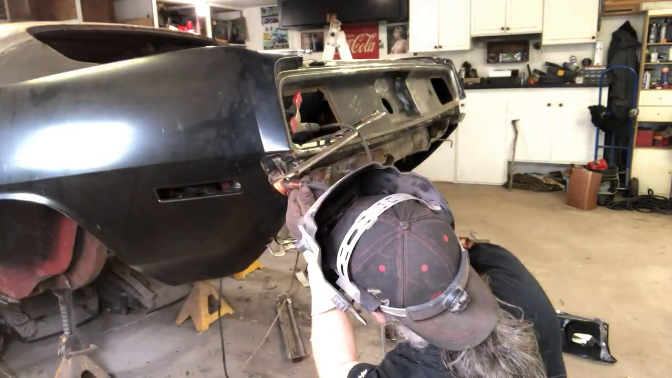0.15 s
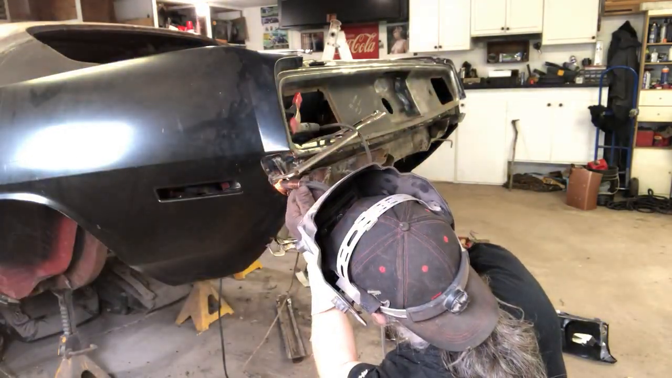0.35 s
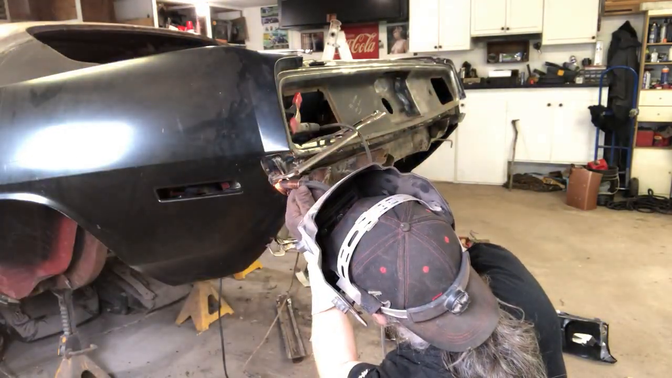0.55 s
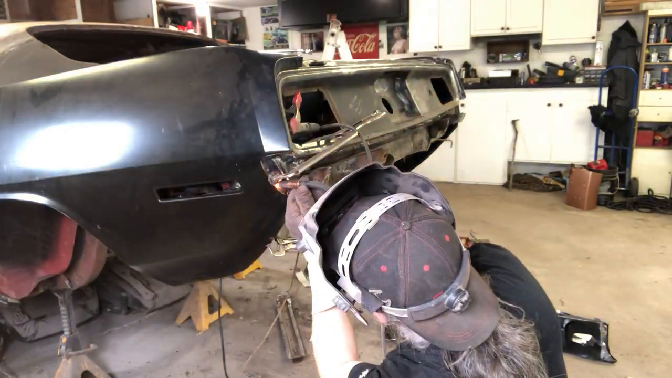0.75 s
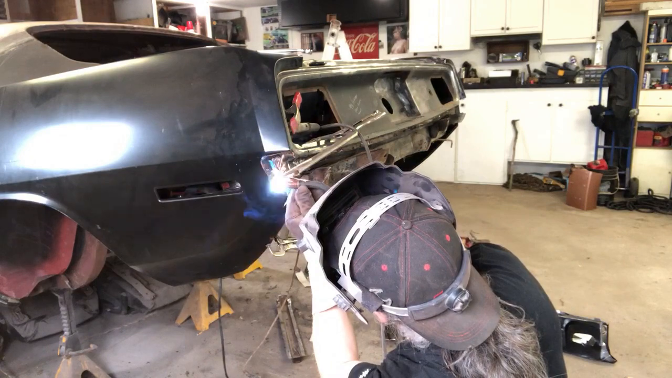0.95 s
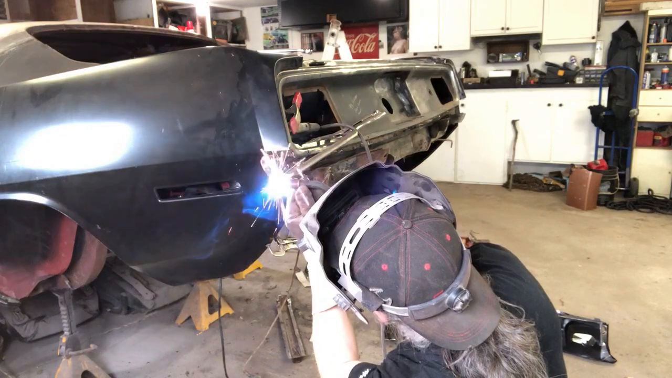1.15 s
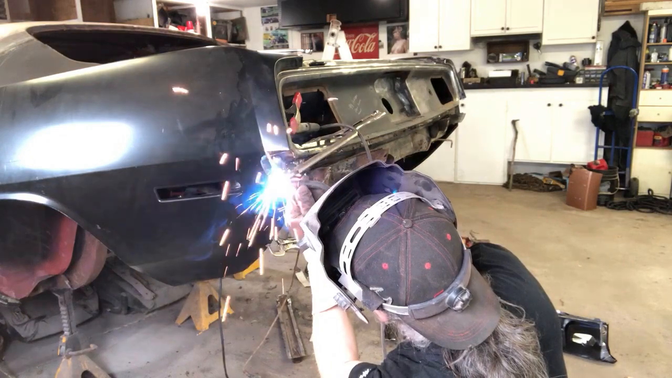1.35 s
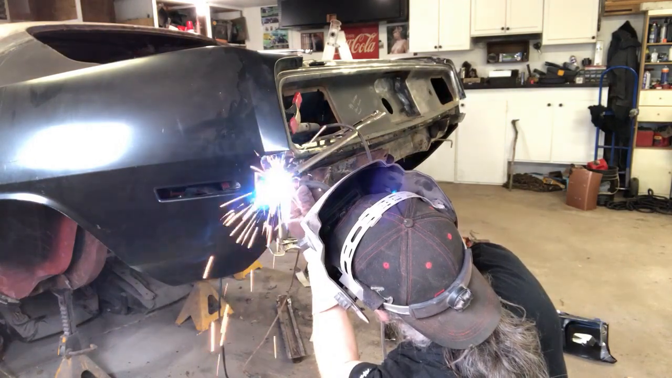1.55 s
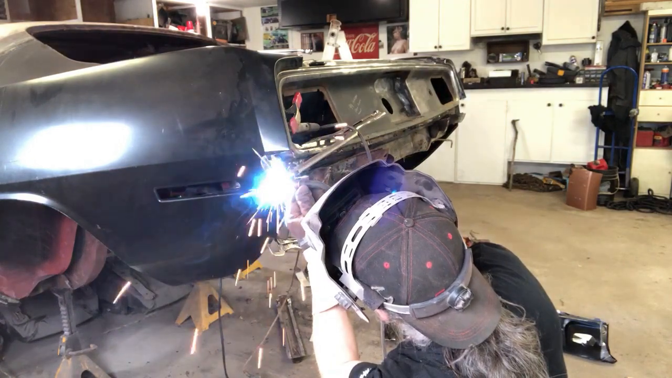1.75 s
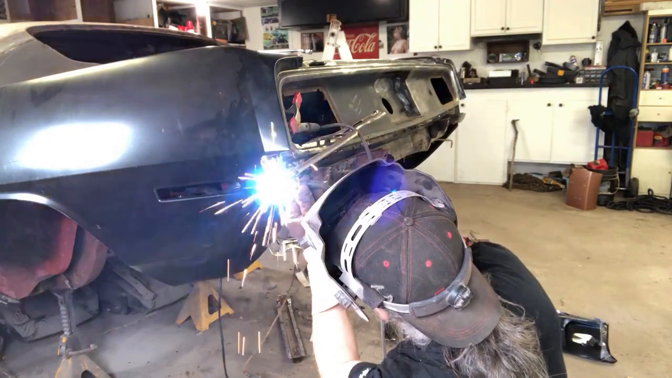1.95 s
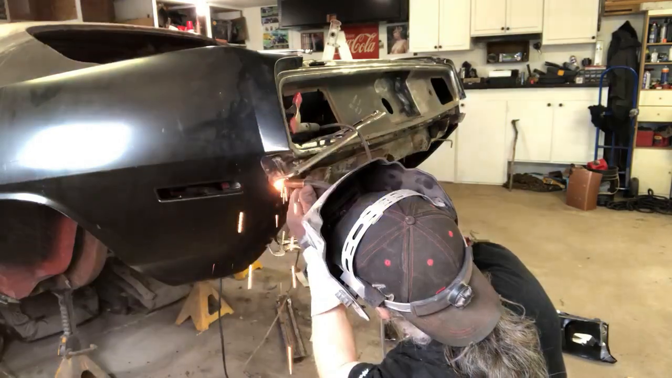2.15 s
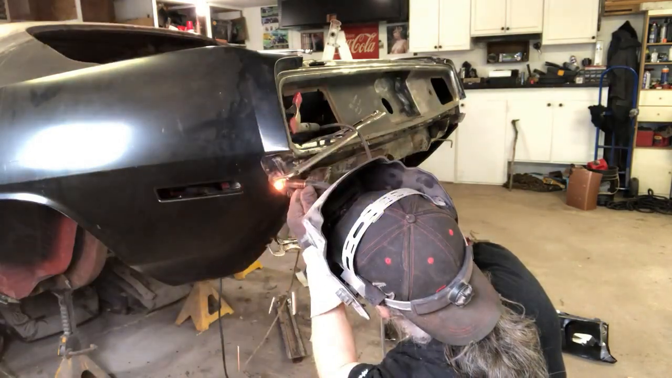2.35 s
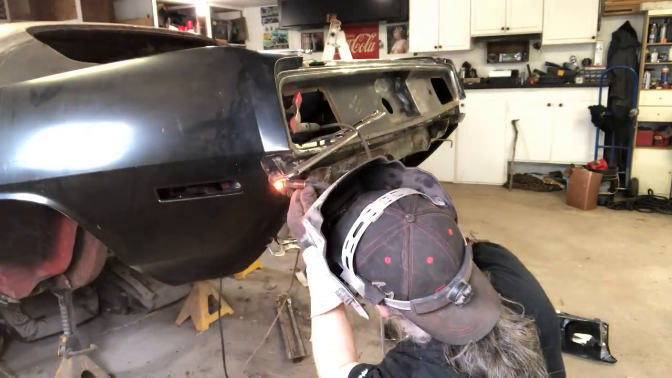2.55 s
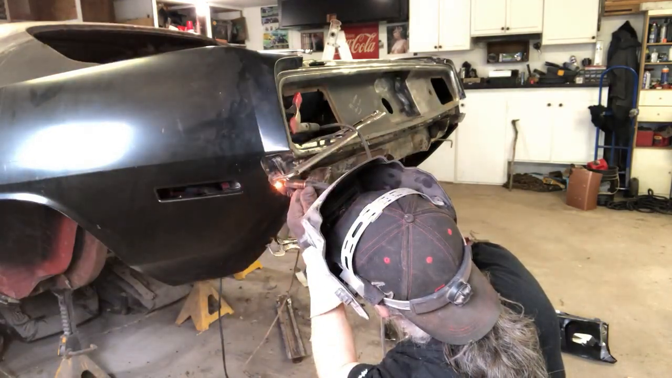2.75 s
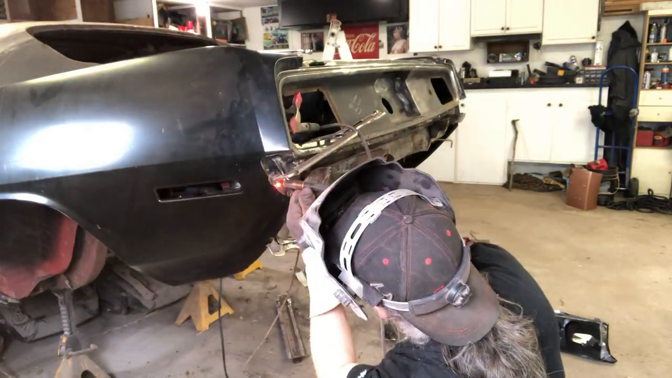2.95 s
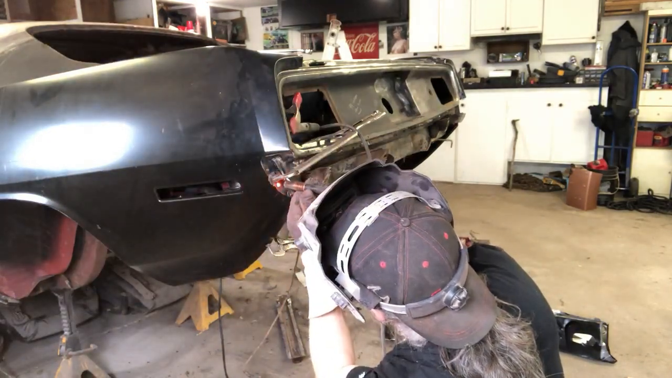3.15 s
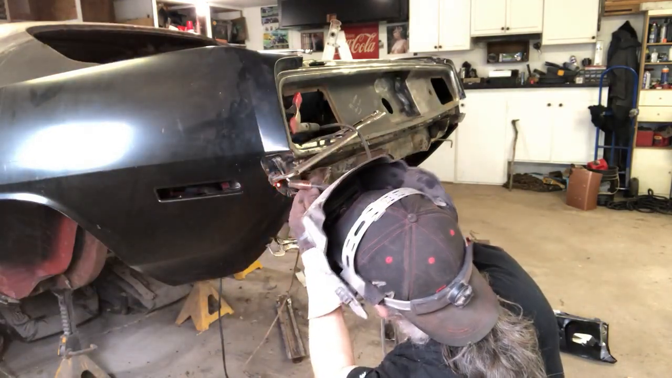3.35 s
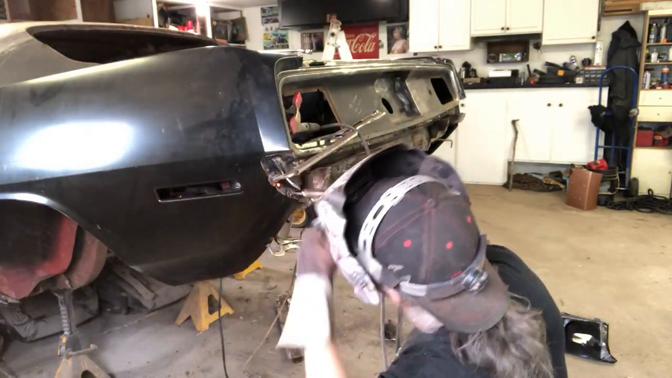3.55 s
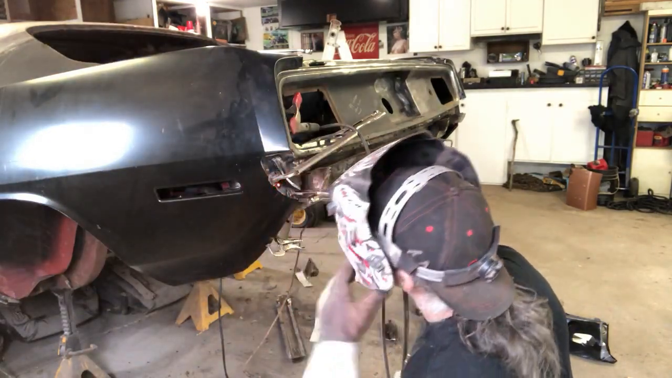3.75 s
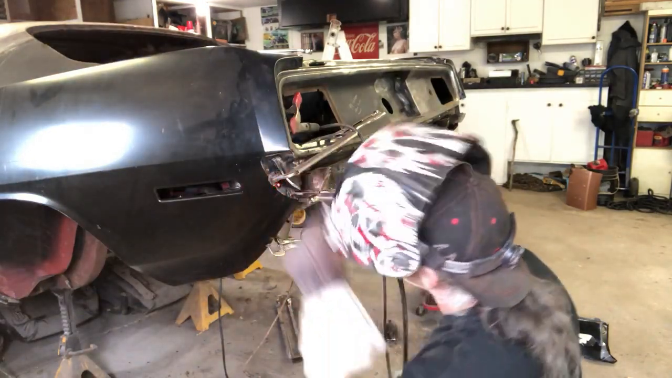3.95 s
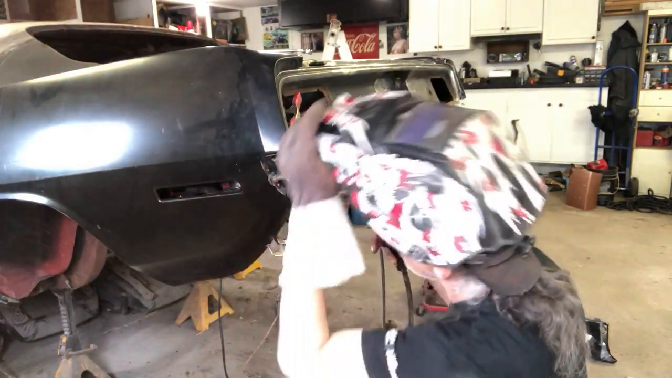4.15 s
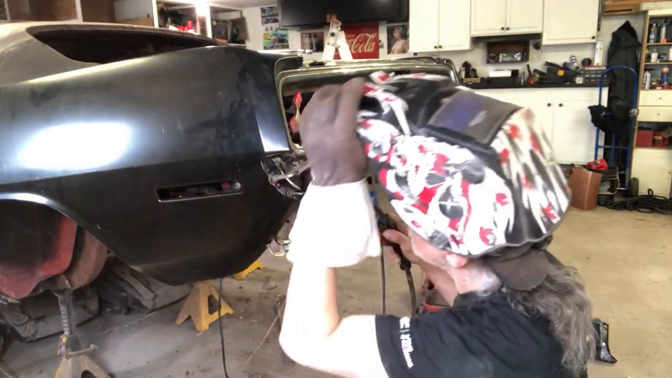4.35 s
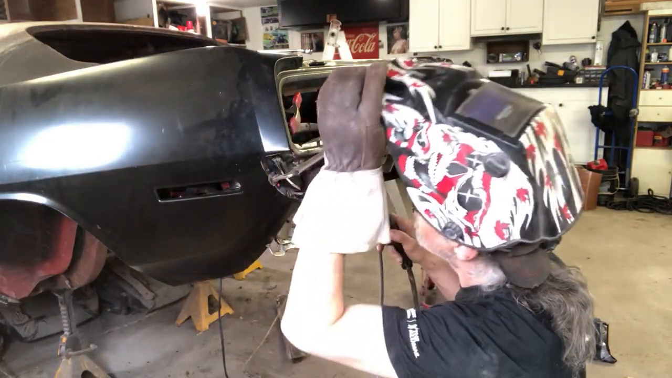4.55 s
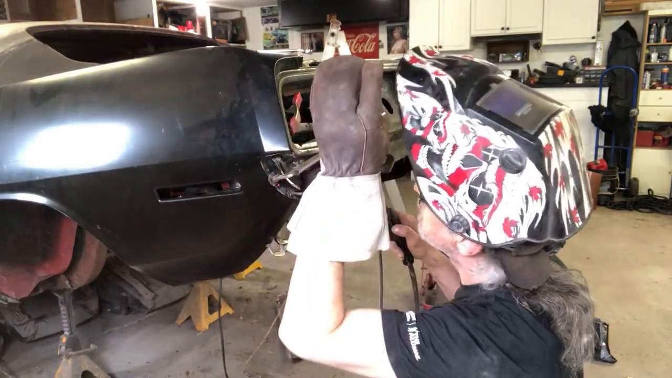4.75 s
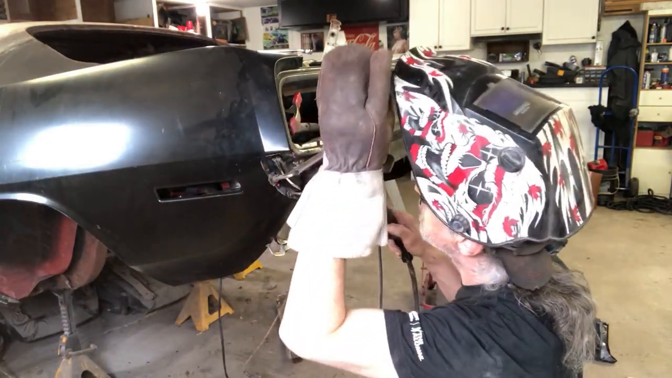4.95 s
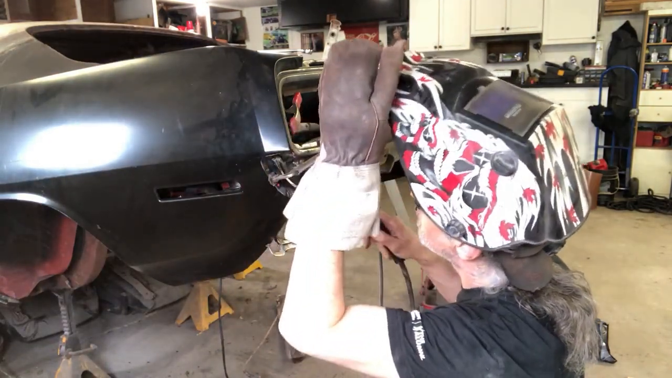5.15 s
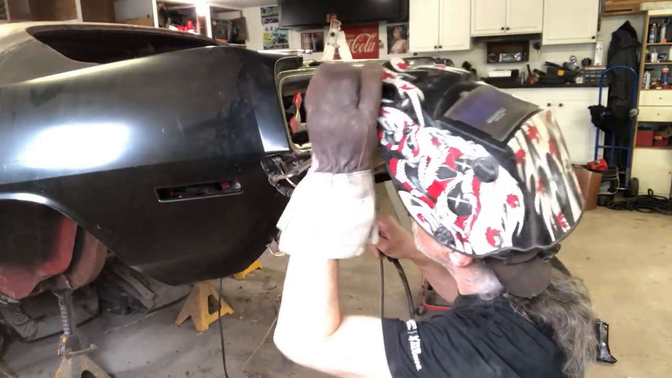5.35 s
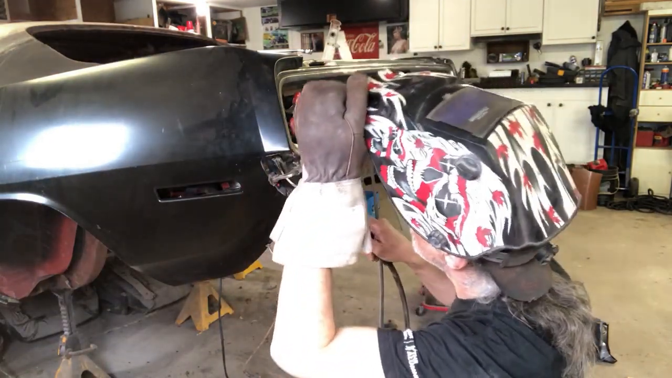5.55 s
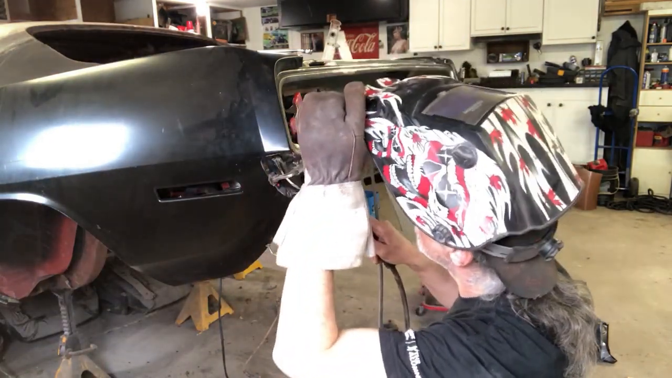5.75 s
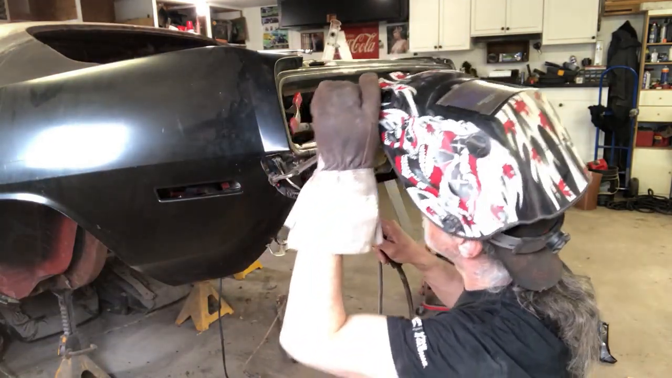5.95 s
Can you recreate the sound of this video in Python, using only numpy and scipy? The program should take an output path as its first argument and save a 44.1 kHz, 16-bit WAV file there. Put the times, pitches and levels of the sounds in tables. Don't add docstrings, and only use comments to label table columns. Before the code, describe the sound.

A welding machine's fan hums steadily in a closed garage while one short, sharply crackling weld burst snaps on sheet metal, then a helmet knocks softly.

```python
import sys
import numpy as np
from scipy import signal
from scipy.fft import rfft, irfft, next_fast_len
from scipy.io import wavfile
from scipy.ndimage import uniform_filter1d

SR = 44100
rng = np.random.default_rng(int(sys.argv[2]) if len(sys.argv) > 2 else 0)


def voltage_ratio(level):
    return 10 ** (np.asarray(level, float) / 20)


def to_wav(s):
    ch = np.atleast_2d(s).T
    pcm = np.round(np.clip(ch, -1, 1) * 32767)
    wavfile.write(sys.argv[1], SR, pcm.astype(np.int16))


N = 264585
SIZE = next_fast_len(N + SR)
HZ = np.fft.rfftfreq(SIZE, 1 / SR)
TIME = np.arange(N) / SR

# [multiple of shaft rate, level/dB, waver/dB]
FAN_TONES = [(4, -58.0, 3.0), (6, -64.0, 3.0), (11, -64.0, 2.2), (16, -70.0, 2.2), (20, -67.0, 2.2),
             (25, -65.0, 2.2), (35, -80.0, 2.2), (40, -83.0, 2.2)]
# [f/Hz, density/dB]
FAN_AIR = [(15, -65), (25, -20.5), (108, -15.5), (245, -4), (304, -20), (433, -16.5), (496, -17),
           (600, -14), (669, -15.5), (1250, -20), (1880, -32.5), (15200, -57), (16500, -83.5)]
# [f/Hz, width/Hz, level/dB]
CASE = [(163.6, 24, -55), (208.4, 35.3, -47), (361, 59, -60), (674.8, 81, -60), (902, 49, -62.5),
        (1163, 440, -64), (2600, 1500, -73.5), (4600, 1600, -80.5)]
SHAFT_HZ, FAN_AIR_DB = 49.41, -49.5
BLADE_DB, SECOND_DB, THIRD_DB = -46.5, -56.5, -64.5
HEAD_UP_S, UNSHADED_DB = 4.25, 9
SAG_SHARE, SAG_LAG_S = .045, .14

# [t/s, level/dB, T60/s]
TRIGGER = [
    (.932, -45, .03),
    (.937, -39, .07),
]
# [t/s, level/dB, ring f/Hz, ring level/dB, T60/s]
KNOCKS = [
    (.933, -37, 2100, -7, .06),
    (.937, -36, 1050, -5, .06),
    (3.0, -74, 900, 20, .14),
    (3.595, -57, 2500, -10, .04),
    (3.912, -55, 3300, -7, .03),
    (3.921, -55, 540, 20, .05),
    (3.93, -70, 85, 22, .15),
    (3.978, -62, 560, 21, .05),
    (4.03, -66, 700, 18, .05),
]
# [t/s, level/dB]
RUSTLE = [
    (3.5, -90),
    (3.9, -74),
    (4.05, -71),
    (4.12, -71),
    (4.15, -65),
    (4.19, -72),
    (4.5, -90),
]
# [t/s, level/dB]
GAS = [
    (.93, -85),
    (.955, -58),
    (.97, -53),
    (1.0, -51),
    (1.15, -52),
    (2.06, -52),
    (2.12, -62),
    (2.3, -85),
]
# [peak t/s, level/dB, rise/s, fall/s]
SURGES = [
    (1.09, -50, .06, .035),
    (1.27, -56, .03, .025),
]
LOAD_HZ = 58.4

# [first t/s, last t/s, relights, strength level/dB]
RUNS = [(1.0139, 1.1379, 3, 2), (1.1552, 1.1868, 4, 2), (1.1999, 1.2327, 4, 2), (1.2464, 1.3037, 5, 2.5),
        (1.3193, 1.3811, 5, 3.5), (1.3941, 1.4482, 4, 3), (1.4636, 1.6037, 9, 4), (1.6304, 1.7018, 5, 2.5),
        (1.7218, 1.7433, 2, 2.5), (1.7517, 1.827, 5, 3.5), (1.8425, 1.8571, 2, 3.5),
        (1.8654, 1.8997, 3, 2.5), (1.9184, 1.9569, 3, 3.5), (1.9749, 2.0051, 3, 4.5), (2.0233, 2.057, 3, 4)]
# [t/s, strength level/dB]
STRAYS = [
    (1.4002, 1),
    (1.4182, 4),
    (1.6116, -1),
    (1.6234, 5),
    (1.6912, 2),
    (1.7293, -4),
]
# [t/s, sputter share 0-1]
SPUTTERS = [
    (1.076, .15),
    (1.138, .6),
    (1.165, .2),
    (1.481, .9),
    (1.623, .8),
    (1.702, .2),
    (1.752, .5),
    (1.938, .9),
    (1.975, .5),
    (2.005, .1),
]
PACE_SCATTER_MS, SIZE_SCATTER_DB, TREBLE_SCATTER_DB = .4, .9, 2.8
SPUTTER_LOSS_DB, SPUTTER_DULL_DB = -3.5, -5
SHOCK, SHOCK_HZ, SHOCK_WIDTH_HZ, SHOCK_TOP_HZ = 1.23, 6000, 7200, 12400
CUP, CUP_HZ, CUP_WIDTH_HZ, CUP_LOW_HZ = -12.36, 6680, 1100, 1843
# [delay/ms, share of pressure]
CLOSE = [(.135, -.785), (.21, .217), (.351, -.251), (.445, .111)]

# [delay/ms, level/dB, top f/Hz]
ECHOES = [(1.82, -14, 7000), (3.92, -18, 14000), (5.08, -17, 14000), (7.4, -22, 14000), (8.8, -23, 14000),
          (10.7, -21, 14000), (12.0, -20, 14000)]
# [f/Hz, level/dB, T60/s]
GARAGE = [(39.7, -46.5, .5), (150, -34.5, 0.31), (494, -38, 0.58), (1240, -33, 0.54), (1860, -45.5, 0.86),
          (3400, -32.5, 0.52), (4950, -38, 0.54), (6840, -37.5, .4), (9860, -38, 0.28),
          (15660, -39.5, 0.24)]
# [delay/ms, boost/dB, spread/ms]
RETURNS = [(5.0, 4, 1.5), (8.5, -5, 1.2), (13.0, 4.5, 3.0), (24.0, -3, 3.5), (35.0, 2, 5.0)]
# [f/Hz, width/Hz, boost/dB]
PANEL = [(160, 25, 9), (450, 60, 6), (580, 80, 5), (1170, 200, 6), (1550, 120, 5), (2740, 150, 4.5),
         (3300, 500, 3), (5090, 300, 6), (8400, 1200, 7), (11500, 1200, 4)]
# [f/Hz, level/dB, T60/s]
BOOM = [(57.3, -57, .6), (164.8, -57, 0.48), (265, -58, 0.81)]
BOOM_BUILD_S = .05
WIDE_DB, WIDE_HZ, WIDE_RARITY = -7.0, 5000, 1.15


def shape(x, gain):
    return irfft(rfft(x, SIZE) * gain, SIZE)[:N]


def peak(f, hz, width_hz):
    return 1j * f * width_hz / (hz ** 2 - f ** 2 + 1j * f * width_hz)


def unit(x):
    return x / np.sqrt(np.mean(x ** 2))


def curve(rows, column=1):
    return np.interp(TIME, [r[0] for r in rows], [r[column] for r in rows])


def walk(rate):
    k = int(SR / rate)
    held = np.repeat(rng.standard_normal(N // k + 1), k)
    return 1.2 * uniform_filter1d(uniform_filter1d(held, k), k)[:N]


def add(track, s, sound):
    i = int(s * SR)
    track[i:i + len(sound)] += sound[:N - i]


def fan():
    loaded = (TIME > TRIGGER[0][0]) & (TIME < RUNS[-1][1] + .03)
    lag = 1 / (SAG_LAG_S * SR)
    sag = SAG_SHARE * signal.lfilter([lag], [1, lag - 1], 1. * loaded)
    turn = 2 * np.pi * np.cumsum(SHAFT_HZ * (1 - sag + 0.00093 * walk(1.5))) / SR
    tones = np.zeros(N)
    for k, db, waver in FAN_TONES:
        tones += voltage_ratio(db + waver * walk(2.5)) * np.sin(k * turn + rng.uniform(0, 6.9))
    head_db = UNSHADED_DB / (1 + np.exp(-(TIME - HEAD_UP_S) / .06))
    tones += voltage_ratio(BLADE_DB + 0.73 + 0.9 * walk(6)) * np.sin(5 * turn)
    tones += voltage_ratio(SECOND_DB + 1.2 * walk(2) - 1.5) * np.sin(10 * turn + 2)
    tones += voltage_ratio(THIRD_DB + head_db + 1.5 * walk(2) - 2.5) * np.sin(15 * turn + 1)
    table = np.array(FAN_AIR)
    colour = voltage_ratio(np.interp(np.log(HZ + 1), np.log(table[:, 0]), table[:, 1]))
    air = voltage_ratio(FAN_AIR_DB + 1.2 * walk(1.6)) * unit(shape(rng.standard_normal(N), colour))
    for hz, width_hz, db in CASE:
        air += voltage_ratio(db) * unit(shape(rng.standard_normal(N), peak(HZ, hz, width_hz) ** 2))
    return np.sqrt(2) * tones + air


def trigger():
    out, t = np.zeros(N), np.arange(SR // 4) / SR
    for s, db, t60 in TRIGGER:
        add(out, s, rng.standard_normal(len(t)) * voltage_ratio(db - 60 * t / t60))
    return shape(out, .5 + peak(HZ, 9500, 3500))


def handling(tick_hz=1400):
    ticks, rings, t = np.zeros(N), np.zeros(N), np.arange(SR // 4) / SR
    for s, db, hz, ring_db, t60 in KNOCKS:
        wobble = np.cumsum(rng.standard_normal(len(t))) * hz / 40000
        add(ticks, s, rng.standard_normal(len(t)) * voltage_ratio(db - 60 * t / .08))
        add(rings, s, voltage_ratio(db + ring_db - 60 * t / t60) * np.sin(2 * np.pi * hz * t + wobble))
    ticks = shape(ticks, peak(HZ, tick_hz, 3 * tick_hz) ** 2)
    cloth = unit(shape(rng.standard_normal(N), peak(HZ, 2100, 3000) ** 2))
    return ticks + rings + cloth * voltage_ratio(curve(RUSTLE) + 2.8 * walk(60))


def gas():
    jet = unit(shape(rng.standard_normal(N), peak(HZ, 5200, 3500) ** 2))
    return jet * voltage_ratio(curve(GAS) + 0.83 * walk(40))


def transformer():
    swell = np.zeros(N)
    for s, db, rise, fall in SURGES:
        spread = np.where(TIME < s, rise, fall)
        swell += voltage_ratio(db) * np.exp(-((TIME - s) / spread) ** 2 / 2)
    return np.sqrt(2) * swell * np.sin(2 * np.pi * LOAD_HZ * TIME)


def relights():
    regular = [(s, db) for first, last, n, db in RUNS for s in np.linspace(first, last, n)]
    s, db = np.array(sorted(regular + list(STRAYS))).T
    chance, sputter = rng.standard_normal((3, len(s))), np.zeros(len(s))
    for when, share in SPUTTERS:
        sputter[np.argmin(np.abs(s - when))] = share
    inner = ~np.isin(s, [r[k] for r in RUNS for k in (0, 1)] + [r[0] for r in STRAYS])
    when = s + inner * chance[0] * PACE_SCATTER_MS / 1000
    strength_db = db + SIZE_SCATTER_DB * chance[1] + SPUTTER_LOSS_DB * sputter
    treble_db = TREBLE_SCATTER_DB * chance[2] + SPUTTER_DULL_DB * sputter
    return np.array([when, strength_db, treble_db, sputter]).T


def arc(sputter_ms=1.5, treble_hz=8000, puff_db=-14.0, puff_hz=500):
    size, lead = 1024, 400
    f, t = np.fft.rfftfreq(size, 1 / SR), (np.arange(size) - lead) / SR
    shock = SHOCK * peak(f, SHOCK_HZ, SHOCK_WIDTH_HZ)
    cup = CUP * peak(f, CUP_HZ, CUP_WIDTH_HZ) * peak(f, CUP_LOW_HZ, 1.5 * CUP_LOW_HZ)
    puff = voltage_ratio(puff_db) / (1 + 1j * f / puff_hz)
    shade = np.exp(-(f / SHOCK_TOP_HZ) ** 2)
    shade = shade * (1 - .9 * peak(f, 12800, 1200)) * (1 + 1.2 * peak(f, 14600, 2500))
    snap, crackle, bare = np.zeros((3, N))
    for s, db, treble_db, sputter in relights():
        s = s + rng.uniform(-.00005, .00005)
        drift, grit = 1 + .03 * rng.standard_normal(), rng.standard_normal((2, size))
        bounce = 1 + sum(share * np.exp(-2j * np.pi * f * ms * drift / 1000) for ms, share in CLOSE)
        tilt = voltage_ratio(db + 1.1 + treble_db / (1 + (treble_hz / (f + 1)) ** 8))
        colour = tilt * ((shock + cup * bounce) * shade + puff)
        place = np.exp(-2j * np.pi * f * (lead - 4.6 + (s * SR) % 1) / SR)
        grit = grit * np.exp(-np.abs(t) * 1000 / sputter_ms)
        grit = grit / np.sqrt(np.sum(grit ** 2, axis=1, keepdims=True))
        grit = irfft(rfft(grit) * colour)
        share = min(1.5 * sputter + .03, .95)
        clean = np.sqrt(1 - share) * irfft(colour * place)
        add(snap, s - lead / SR, clean + np.sqrt(share) * grit[0])
        add(crackle, s - lead / SR, np.sqrt(share) * grit[1])
        bare[int(s * SR)] = voltage_ratio(db)
    return snap, crackle, bare


def echoes():
    gain = 0
    for ms, db, hz in ECHOES:
        gain = gain + voltage_ratio(db) * np.exp(-2j * np.pi * HZ * ms / 1000) / (1 + (HZ / hz) ** 4)
    return gain


def garage(start_ms=1.6, build_ms=1.8):
    t = np.arange(SR) / SR
    f = np.fft.rfftfreq(SR, 1 / SR)
    noise, tail, table = rfft(rng.standard_normal(SR)), 0, np.array(GARAGE)
    for hz in 40 * 2 ** np.arange(0, 9, .5):
        db, t60 = (np.interp(np.log(hz), np.log(table[:, 0]), table[:, k]) for k in (1, 2))
        band = np.cos(np.pi * np.clip(np.log2((f + 1) / hz), -.5, .5)) ** 2
        tail = tail + irfft(noise * band) * voltage_ratio(db - 60 * t / max(t60, .05))
    bunch_db = sum(db * np.exp(-((t * 1000 - ms) / spread) ** 2 / 2) for ms, db, spread in RETURNS)
    tail = tail * voltage_ratio(bunch_db) * np.clip((t * 1000 - start_ms) / build_ms, 0, 1)
    thin = 1 / np.sqrt(1 + (140 / (HZ + 1)) ** 6)
    panel = 1 + sum((voltage_ratio(db) - 1) * peak(HZ, hz, width_hz) for hz, width_hz, db in PANEL)
    return rfft(tail, SIZE) * thin * panel


def boom():
    t = np.arange(SR) / SR
    modes = sum(voltage_ratio(db - 60 * t / t60) * np.sin(2 * np.pi * hz * t) for hz, db, t60 in BOOM)
    return rfft((1 - np.exp(-(t / BOOM_BUILD_S) ** 2)) * modes, SIZE)


def patches(wide, crackle):
    edges = np.geomspace(WIDE_HZ, 16000, 11)
    busy = uniform_filter1d(crackle ** 2, size=1200)
    urge = 3 * np.sqrt(np.abs(busy) / busy.max()) + .6 * walk(60)
    lean, out = .6 * walk(50), 0
    burning = (TIME > RUNS[0][0] + .052) & (TIME < RUNS[-1][1] + .015)
    for k, (lo, hi) in enumerate(zip(edges, edges[1:])):
        on = burning & (urge + lean * (k / 4.5 - 1) + .6 * walk(50) > WIDE_RARITY)
        out = out + uniform_filter1d(1. * on, size=300) * shape(wide, (HZ >= lo) & (HZ < hi))
    return out


def scene():
    small = trigger() + handling() + gas()
    snap, crackle, bare = arc()
    room = garage()
    mid = fan() + transformer() + small + voltage_ratio(-3.0) * shape(small, room)
    mid = mid + snap + shape(snap, echoes()) + shape(bare, room + boom())
    wide = voltage_ratio(5.5) * crackle + shape(bare, garage())
    side = voltage_ratio(WIDE_DB) * patches(wide, crackle)
    return np.array([mid + side, mid - side])


def top_cut(x):
    return signal.sosfilt(signal.butter(12, 17090, fs=SR, output="sos"), x)


def record(dry):
    mid = dry.mean(axis=0)
    x = dry - mid + np.tanh(mid)
    x = signal.sosfilt(signal.butter(2, 45, "high", fs=SR, output="sos"), x)
    x = signal.sosfiltfilt(signal.ellip(8, .1, 50, 15950, fs=SR, output="sos"), x)
    return top_cut(x)


dry = scene()
out = record(dry)
to_wav(out)
```